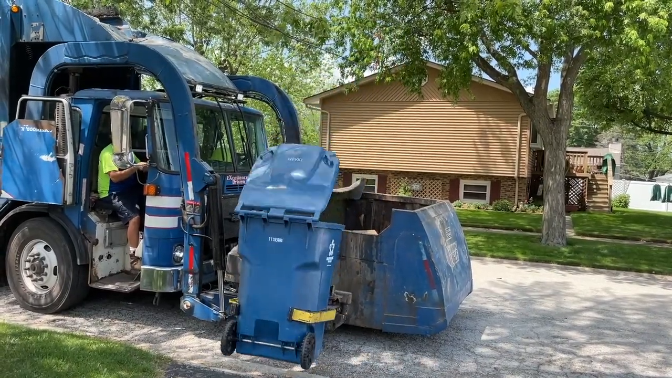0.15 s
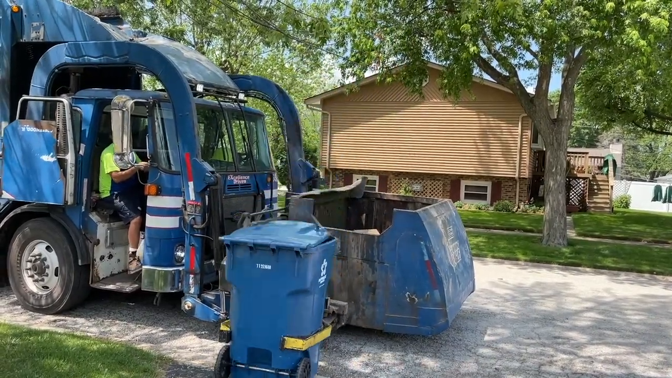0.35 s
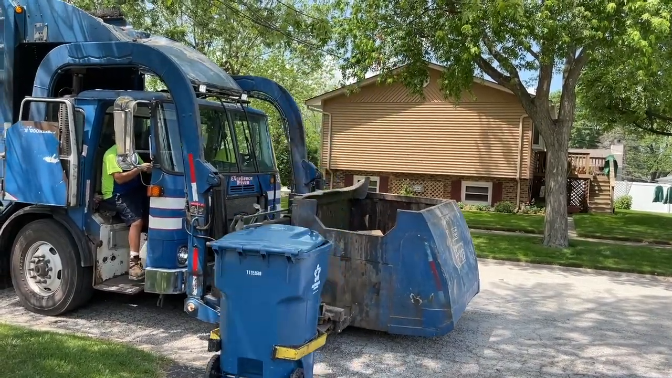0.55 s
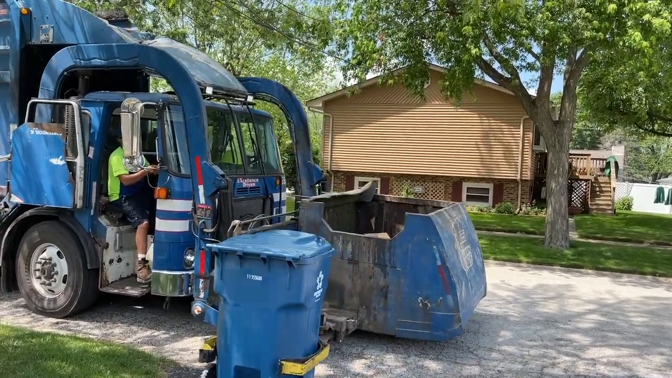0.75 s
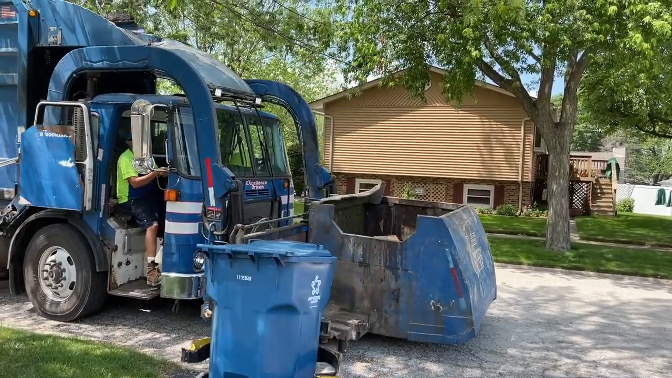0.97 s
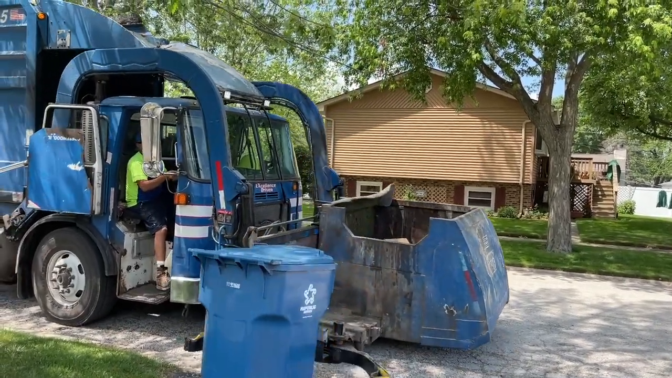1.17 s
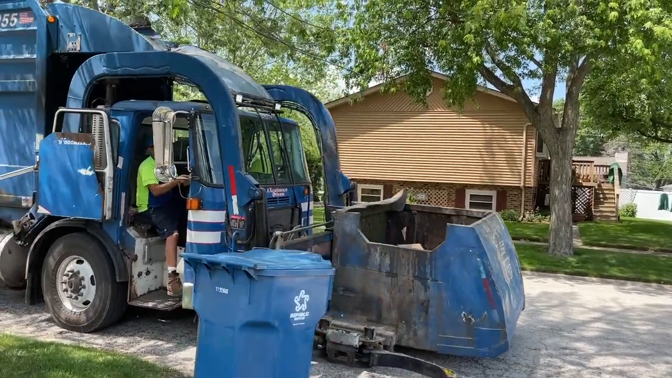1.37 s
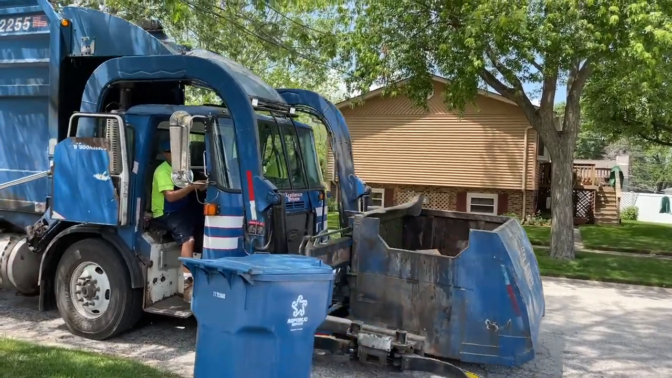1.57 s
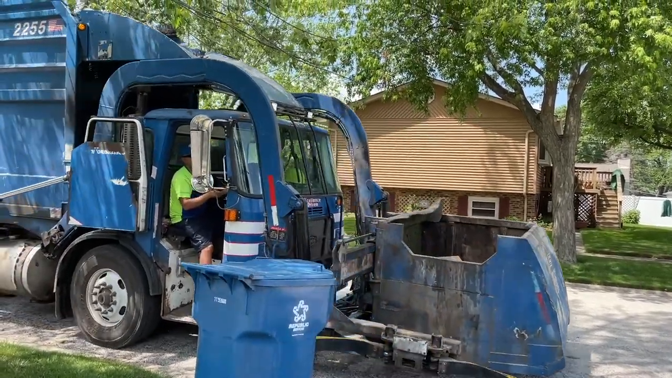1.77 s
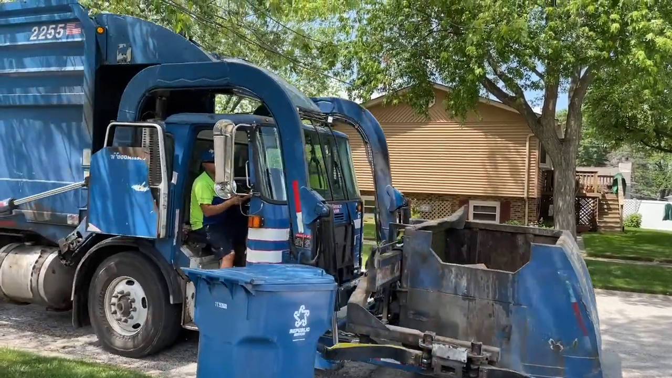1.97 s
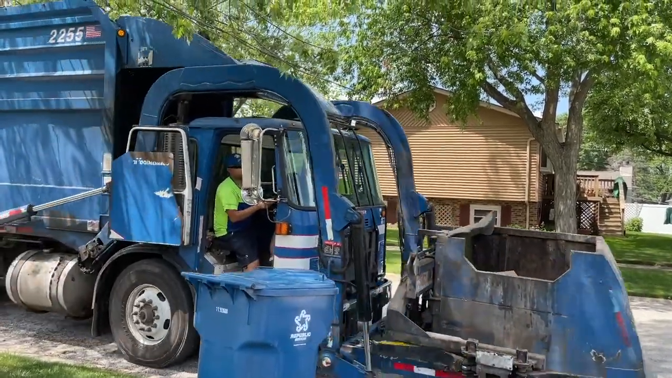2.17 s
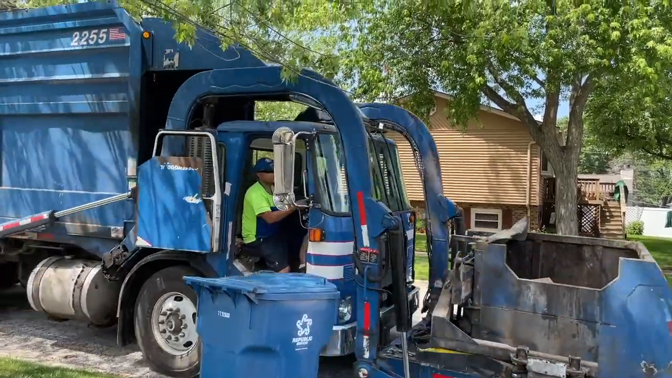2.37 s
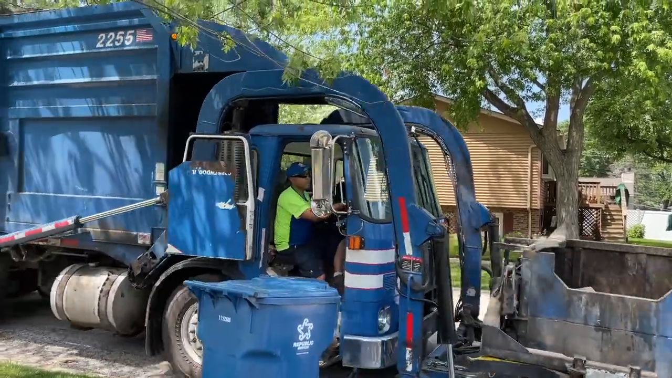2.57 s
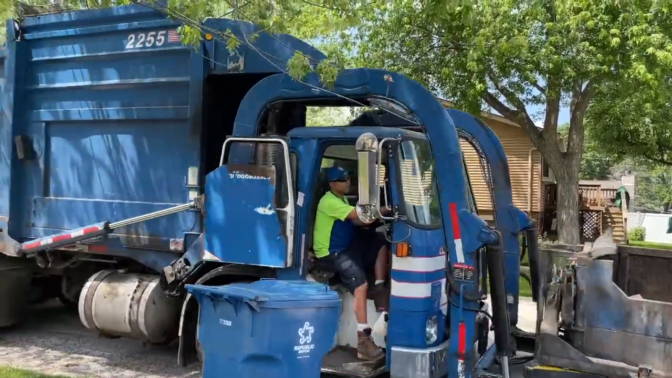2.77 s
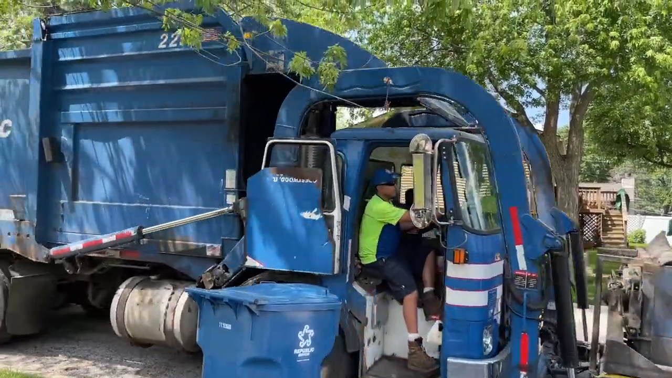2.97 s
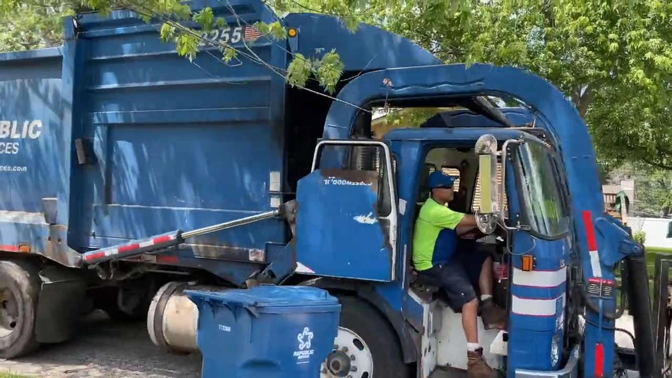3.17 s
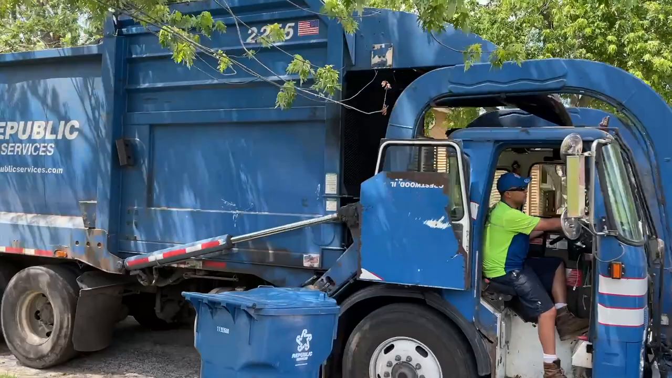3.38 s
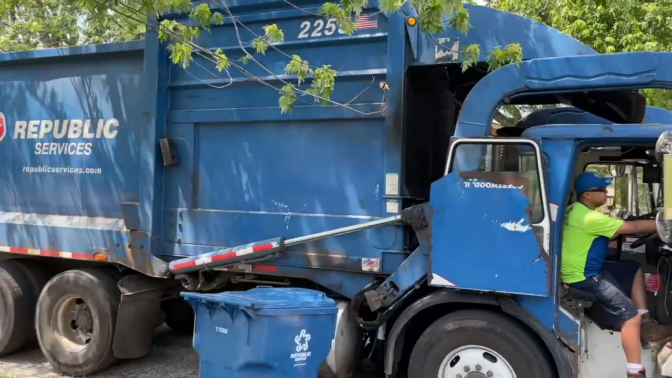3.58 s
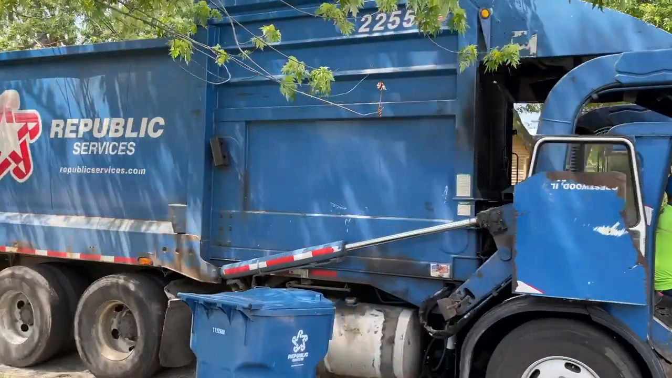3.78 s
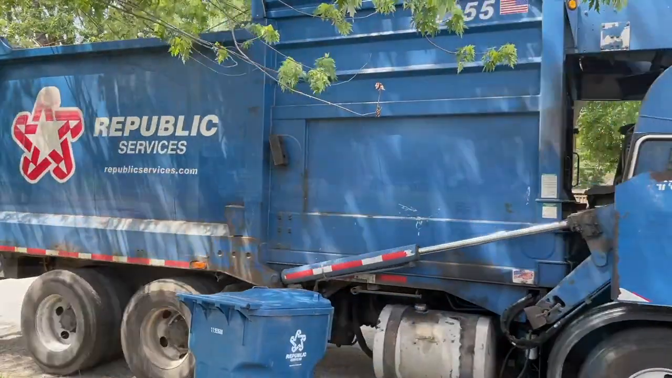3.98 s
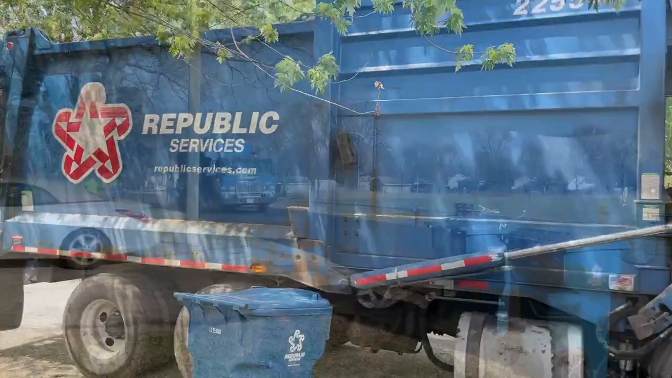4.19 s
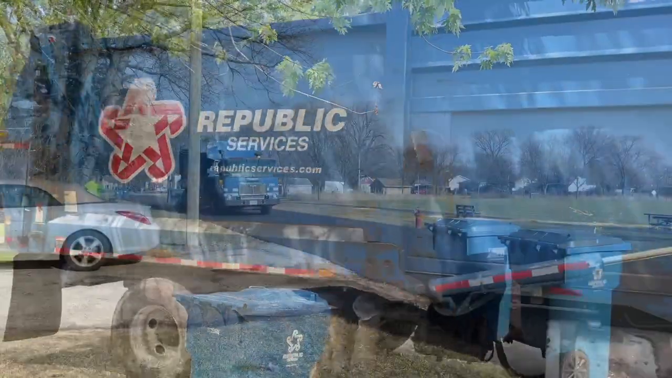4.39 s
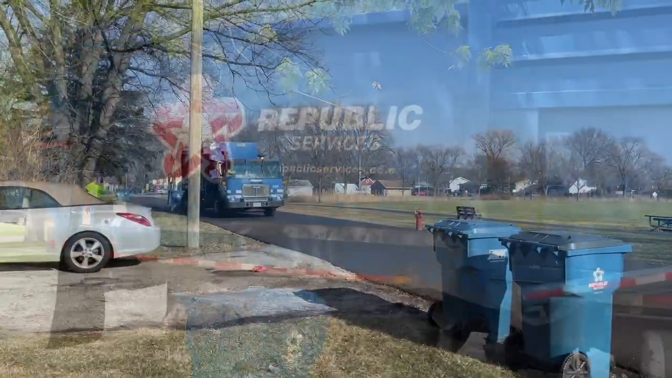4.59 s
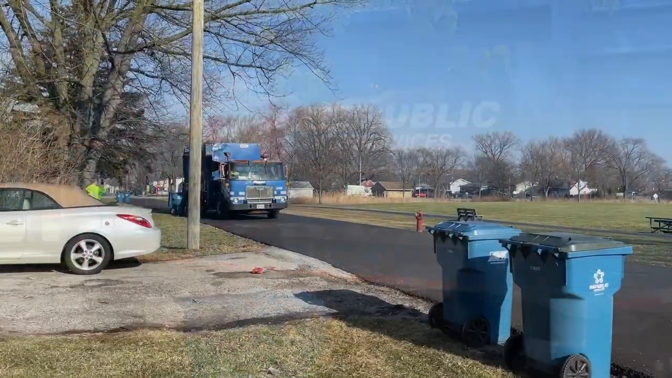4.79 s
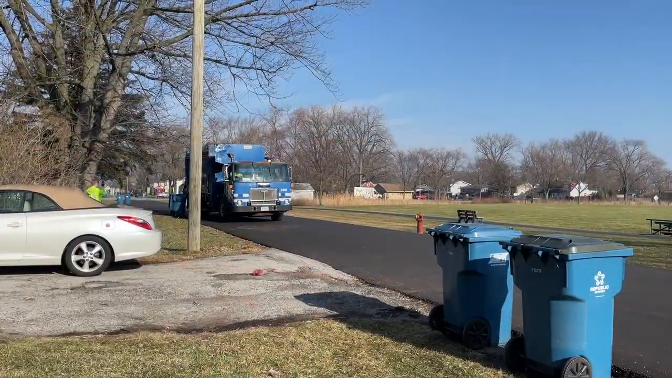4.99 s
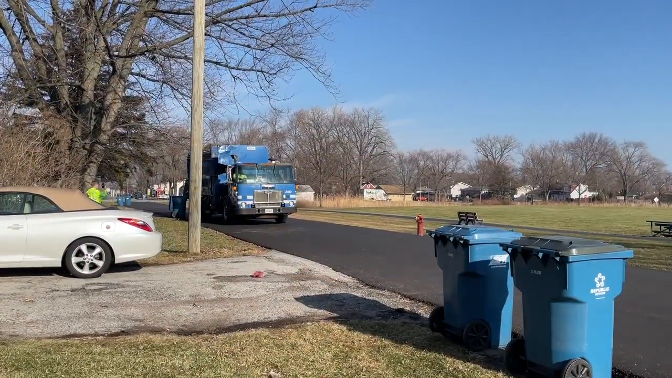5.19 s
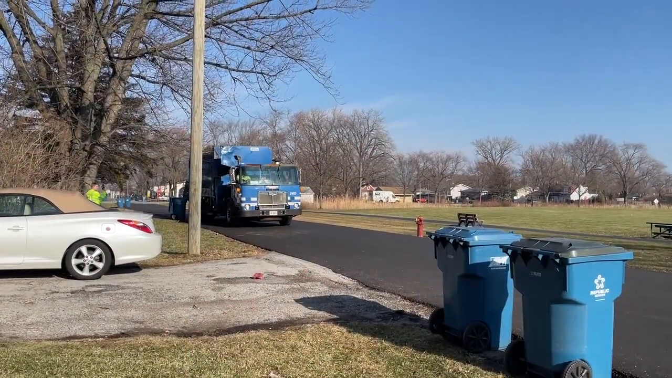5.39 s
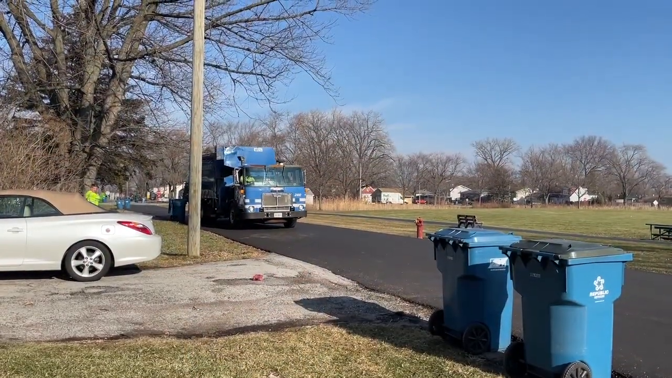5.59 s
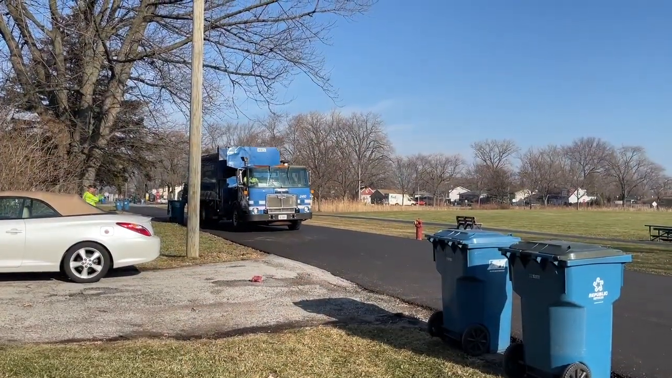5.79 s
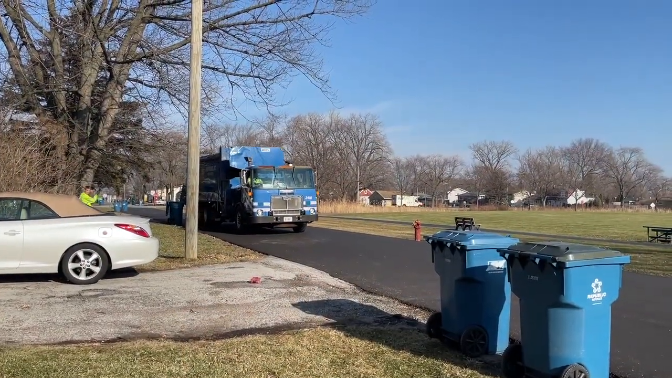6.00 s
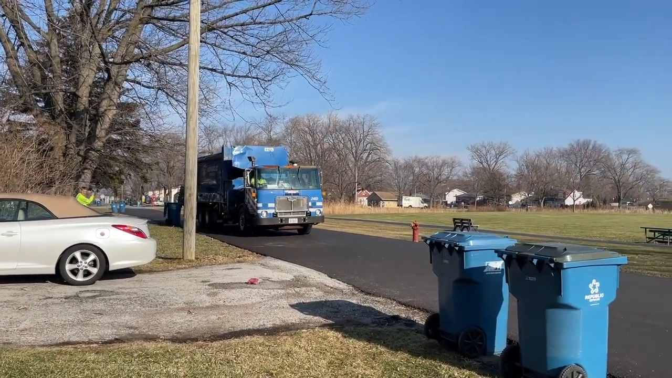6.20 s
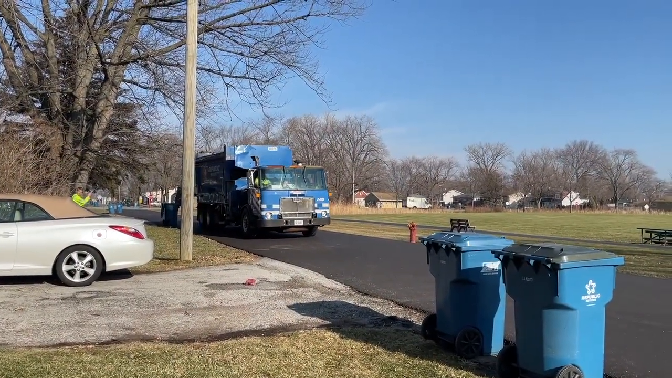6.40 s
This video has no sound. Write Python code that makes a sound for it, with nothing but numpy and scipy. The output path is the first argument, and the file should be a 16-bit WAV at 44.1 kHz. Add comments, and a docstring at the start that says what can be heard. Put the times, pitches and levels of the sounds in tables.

```python
"""A street, a few metres from a refuse truck, heard through a two-port microphone: a plastic cart is set down
(ringing thuds), the arm clanks home (struck modes) and the diesel pulls past from left to right: pump whine,
exhaust beat and turbo whistle (wavering sines), roar (noise bands). As it fades out, a second, farther truck
that hummed underneath is left (crankshaft tones, noise); it speeds up and thuds over a bump. Near the end the
sound drops out for 22 ms."""
import sys
import numpy as np
from scipy import signal
from scipy.fft import rfft, irfft
from scipy.io import wavfile
from scipy.ndimage import uniform_filter1d

SR = 44100
rng = np.random.default_rng(int(sys.argv[2]) if len(sys.argv) > 2 else 0)


def put_to_file(sound):
    """Save the sound as 16-bit audio at rate SR, in the file named by the first command-line argument."""
    columns = np.atleast_2d(sound).T  # one column per channel
    safe = np.clip(columns, -1, 1)
    whole_steps = np.round(safe * 32767)
    wavfile.write(sys.argv[1], SR, whole_steps.astype(np.int16))


N = 284445
T = np.arange(N) / SR
STEP = 32  # samples per step of the slow level controls
PATHS = 2  # direct and scattered sound
DROPOUT_S = (6.0152, 6.037)


def undb(db):
    """Amplitude factor of a level in dB."""
    return 10 ** (np.asarray(db) / 20)


def curves(table):
    """Columns of a time table, sample by sample."""
    s, *columns = np.transpose(table)
    return [np.interp(T, s, c) for c in columns]


def on_log(table, hz):
    """Second column of a frequency table, read along log frequency."""
    f, v = np.transpose(table)
    return np.interp(np.log(np.maximum(hz, 1)), np.log(f), v)


def ramp(start_s, end_s):
    """Straight rise from 0 to 1 between two times."""
    return np.clip((T - start_s) / (end_s - start_s), 0, 1)


def gate(start_s, end_s, edge_s):
    """1 between two times, with straight edges inside them."""
    return np.clip(np.minimum(T - start_s, end_s - T) / edge_s, 0, 1)


def walk(rate):
    """Random levels held 1 / rate s and slewed twice; spread near 1."""
    k = int(SR / rate)
    held = np.repeat(rng.standard_normal(size=4096)[:N // k + 1], k)
    return 1.32 * uniform_filter1d(uniform_filter1d(held, k), k)[:N]


def band(x, lo_hz, hi_hz, order=2):
    """Butterworth band-pass."""
    edges = [lo_hz, min(hi_hz, .45 * SR)]
    return signal.sosfilt(signal.butter(order, edges, "band", fs=SR, output="sos"), x)


def unit(x):
    """The signal scaled to rms 1."""
    return x / np.sqrt(np.mean(x ** 2))


def narrow(hz, width):
    """A narrow band of noise, rms 1."""
    return unit(band(rng.standard_normal(N), hz - width / 2, hz + width / 2))


def decay(t, t60):
    """Amplitude that falls 60 dB in t60 seconds."""
    return 1000. ** (-t / t60)


def ring(x, hz, t60):
    """One decaying mode, gain 1 for noise."""
    r = np.exp(-np.log(1000) / (t60 * SR))
    w = 2 * np.pi * hz / SR
    return signal.lfilter([np.sin(w) * np.sqrt(2 * (1 - r * r))], [1, -2 * r * np.cos(w), r * r], x)


def tone(hz, db, waver_db, drift, rate=12, waver_rate=14):
    """A wavering sine about the given rms level; quick drift blurs it."""
    phase = 2 * np.pi * (np.cumsum(hz * (1 + drift * walk(rate))) / SR + rng.random())
    return np.sqrt(2) * undb(db + waver_db * walk(waver_rate)) * np.sin(phase)


def far_share():
    """Share of the far street's port and scatter settings, taking over from the near ones."""
    return ramp(4.58, 4.69)


def near_fade():
    """Gain of the near truck as it fades out."""
    start_s, end_s = 4, 4.69
    return np.clip((end_s - T) / (end_s - start_s), 0, 1) ** 0.83


# far truck, steady and then drawing closer: (time [s], level about its closest [dB])
FAR_LEVEL = [(4.4, -8), (4.7, -9.5), (5.5, -6), (5.8, -3), (6.1, -2.5), (6.45, -2)]
# far crankshaft, faster after the dropout: (time [s], speed [turns/s])
FAR_CRANK = [(4.3, 21.5), (4.75, 22.8), (5.2, 25.3), (5.7, 29.2), (5.82, 29.65), (6.02, 29.8), (6.03, 33.1),
             (6.45, 32.8)]
# its tones: [cycles per crank turn], then the level of each [dB] speeding up and running steady
FAR_ORDERS = [1.5, 3, 4, 5.5, 6, 7, 8, 10, 12, 13, 15, 16, 21, 26]
FAR_EARLY_DB = [-18, -1.5, -16, -5, -7.5, -14, -31, -3, -2.5, -23, -28, -18.5, -14, -14.5]
FAR_LATE_DB = [-18, 3, -2, -3, -13, -22, -5, 0, -7, -14, -13, -14, -12, -18]
FAR_TONES_DB = -29  # common level of the far tones


def far_engine():
    """Far diesel: sines locked to multiples of the crank speed."""
    (crank,), (far_db,) = curves(FAR_CRANK), curves(FAR_LEVEL)
    out = np.zeros(N)
    for order, early_db, late_db in zip(FAR_ORDERS, FAR_EARLY_DB, FAR_LATE_DB):
        order_db = np.where(T < DROPOUT_S[1], early_db, late_db)
        out += tone(order * crank, FAR_TONES_DB + far_db + order_db, 2, 0.003)
    return out


# far fan and tyre resonances: (centre [Hz], width [Hz], closest level speeding up [dB], running steady [dB])
FAR_HUM = [(1390, 70, -46, -41), (2450, 300, -51, -44), (840, 60, -48, -46)]


def far_hum():
    """Fan and tyre resonances: narrow bands of noise that grow as the far truck nears."""
    (far_db,) = curves(FAR_LEVEL)
    out = np.zeros(N)
    for hz, width, early_db, late_db in FAR_HUM:
        db = np.where(T < DROPOUT_S[1], early_db, late_db) + far_db + 1.3 * walk(15)
        out += undb(db) * narrow(hz, width)
    return out


# hollow thuds of cart and hopper, then the far bump: (time [s], level [dB], pitch [Hz], t60 [s])
THUDS = [(0, -2.5, 95, 0.058), (.002, -10.5, 304, 0.12), (0.029, -4, 85.5, 0.12), (.062, -12, 610, 0.081),
         (0.17, -10, 78, 0.11), (0.403, 1.5, 201.4, 0.047), (0.438, -3, 89.5, 0.14), (.44, -6, 188, .06),
         (0.52, -14, 77.6, 0.24), (0.626, -8.5, 102, 0.066), (0.717, -5, 219, 0.055),
         (.731, -11.5, 167, 0.059), (0.723, -12.5, 113, 0.22), (0.884, -7, 303, .06),
         (0.899, -7, 228, 0.073), (.899, -7, 556, .05), (0.928, -9.5, 96, 0.37), (.981, -8, 546, .07),
         (.993, -9, 708, 0.084), (1.064, -8.5, 232, .06), (1.078, -8, 108, 0.087), (1.129, -12, 123, 0.17),
         (1.283, -12, 640, 0.062), (1.286, -13, 79.5, 0.12), (2.009, -10.5, 733, 0.16),
         (2.022, -22, 730, 0.076), (2.125, -12.5, 283, 0.13), (2.203, -14, 870, 0.13),
         (2.205, -10, 1180, 0.045), (2.236, -15, 596, 0.081), (2.254, -9.5, 90, 0.16),
         (5.786, -6.5, 220, 0.06), (5.785, -29, 790, 0.077), (5.789, -21, 950, 0.069),
         (5.798, -20.5, 331.5, 0.36), (5.772, -12, 118, .1), (5.81, -6.5, 83.6, 0.21),
         (5.83, -12.5, 190, .1), (5.883, -9.5, 98.4, 0.14), (5.932, -13.5, 89, 0.13)]


def rumble_power(rise_s=0.0076, t60_s=0.22):
    """Power left in loose panels by the thuds so far: a quick rise, then decay."""
    power = 0
    for s, db, *_ in THUDS:
        t = np.maximum(T[::STEP] - s, 0)
        power = power + undb(2 * db) * (1 - np.exp(-t / rise_s)) * decay(2 * t, t60_s)
    return power


# near pump: (time [s], whine pitch [Hz])
PUMP_PITCH = [(0, 135), (1, 150), (1.45, 166), (2.2, 197), (2.95, 235), (3.4, 255), (3.72, 272),
              (3.85, 270), (4.15, 253.5), (4.3, 250), (4.9, 249)]


def firing_phase():
    """Phase 0-1 of the uneven firing of the truck in front, near and then far."""
    (pump_hz,), (crank,) = curves(PUMP_PITCH), curves(FAR_CRANK)
    # far truck: six cylinders, four strokes
    firing_hz = np.where(T < FAR_LEVEL[1][0], pump_hz / 3.43, 3 * crank)
    return np.cumsum(firing_hz * (1 + .03 * walk(23))) / SR % 1


# near engine roar: (time [s], load about full [dB], treble level [dB], mids level [dB])
ROAR = [(0, -11.5, 7, 6), (.3, -16, 6.5, -1), (.6, -15, 2.5, 1), (1.1, -8.5, -3, 2), (1.6, -10, -3.5, 0.5),
        (2.05, -7.5, -0.5, 1), (2.46, -9, -4.5, 1.5), (2.65, -6, -7.5, 1.3), (2.87, -3, -7.5, 1.2),
        (3.16, 0.5, -9.5, -1.6), (3.35, 0.5, -8.5, -0.3), (3.52, 1.1, -4.5, -1), (3.8, 1.7, -2.5, 0),
        (4.06, -1.5, -3, -0.2), (4.3, -4.5, 0, 3), (4.5, -5.5, 1.5, 2)]
# how the roar follows: (frequency [Hz], near level at full load [dB], share of load [1],
# share of treble level [1], far level at its closest [dB], share of far level [1])
ROAR_LAW = [(100, -21, 0.39, 0.016, -29, 0.52), (450, -20, 1., 0.012, -32, 0.48),
            (1990, -27, 0.97, 0.044, -34, 1.21), (5220, -36.5, 0.73, 0.38, -44.5, 1.13),
            (11900, -47, 1, 1., -56, 1.27)]
# colour about those levels, near and far truck: (frequency [Hz], level per band [dB])
NEAR_COLOUR = [(35, -27), (50, -14), (80, -4), (130, -7), (200, -5.5), (330, 0), (500, -8.5), (800, -3.5),
               (1300, -7), (2450, -9), (2800, -11.5), (3300, -4), (6000, -3.5), (8500, 10.5), (11000, 9.5),
               (15000, 6)]
FAR_COLOUR = [(35, -30), (50, -16), (90, -8), (200, -3), (330, -1.5), (480, -9), (750, -0.5), (1120, -9),
              (1410, -5.5), (1780, -10), (2400, -3.5), (4000, -3.5), (6000, -3), (8500, 2), (11500, 21),
              (15000, -29)]
# panel rumble after a thud: (frequency [Hz], level per band about the thud [dB])
RUMBLE = [(50, -26), (100, -13), (300, -25.5), (800, -22.5), (2000, -34), (5500, -55), (13000, -50)]
MIDS_HZ, MIDS_OCTAVES = 1100, 1.5
# air blows off as the arm comes down, steady and then falling
BLOW_HZ, BLOW_OCTAVES, BLOW_DB, BLOW_HOLD_S, BLOW_FALL_DB_PER_S = 6600, 0.77, -37.5, 0.31, 57
FAR_RUMBLE_DB_PER_OCTAVE = -1.5  # the far bump rumbles duller, above 200 Hz


def bump(hz, centre_hz, octaves):
    """Bell-shaped weight along log frequency."""
    return np.exp(-(np.log2(hz / centre_hz) / octaves) ** 2)


def roar(firing, knock=0.58, width=0.049):
    """Engines, blown air and panels: noise bands that swell together, flicker alone and puff at each firing."""
    controls = [*curves(ROAR), *curves(FAR_LEVEL), walk(9), near_fade(), far_share()]
    load_db, treble_db, mids_db, far_db, swell, fade, distant = (c[::STEP] for c in controls)
    puff = unit(1 + knock * np.exp(-firing / width))
    panels = np.sqrt(rumble_power())
    blow_db = BLOW_DB - BLOW_FALL_DB_PER_S * np.maximum(T[::STEP] - BLOW_HOLD_S, 0)
    law = np.array(ROAR_LAW)
    out = 0
    for hz in 38.3 * 2 ** np.arange(0, 9, 1 / 3):  # third-octave centres
        full_db, load_part, treble_part, close_db, far_part = (on_log(law[:, [0, c]], hz) for c in range(1, 6))
        near_db = full_db + load_part * load_db + treble_part * treble_db
        near_db = near_db + mids_db * bump(hz, MIDS_HZ, MIDS_OCTAVES) + on_log(NEAR_COLOUR, hz)
        near = fade * undb(near_db)
        far = undb(close_db + far_part * far_db + on_log(FAR_COLOUR, hz))
        air = undb(blow_db) * bump(hz, BLOW_HZ, BLOW_OCTAVES)
        duller_db = distant * FAR_RUMBLE_DB_PER_OCTAVE * max(np.log2(hz / 200), 0)
        rumble = panels * undb(on_log(RUMBLE, hz) + duller_db)
        gain = np.sqrt(near ** 2 + far ** 2 + air ** 2 + rumble ** 2)
        noise = unit(band(rng.standard_normal((PATHS, N)), hz * 2 ** (-1 / 6), hz * 2 ** (1 / 6)))
        gain = gain * undb(0.5 * swell + 0.8 * walk(18)[::STEP])
        # combustion puffs only the upper bands
        out = out + np.interp(T, T[::STEP], gain) * noise * (puff if hz > 600 else 1)
    return out


# blurred turbocharger whistles, one table each: (time [s], pitch before smoothing [Hz], level [dB])
TURBO = [
    [(2.6, 8700, -66), (3.05, 9850, -54), (3.4, 10650, -49), (3.58, 11150, -44), (3.74, 11480, -42),
     (3.95, 11100, -44), (4.17, 10680, -48), (4.45, 10030, -50), (4.75, 9400, -64)],
    [(4.8, 9100, -66), (5.04, 9850, -56), (5.3, 10760, -54), (5.6, 11700, -53), (5.86, 12120, -52),
     (6.13, 12500, -50), (6.45, 12000, -50)],
    [(2.25, 13000, -60), (2.4, 13500, -55), (2.6, 14600, -54), (2.8, 15900, -56)],
]
TURBO_GLIDE_S = 0.161  # the whistle's pitch rounds every change of speed over this time


def turbochargers():
    """Turbocharger whistles: sines blurred by quick drift, their pitch gliding smoothly."""
    out = np.zeros(N)
    for table in TURBO:
        hz, db = curves(table)
        hz = uniform_filter1d(hz, int(TURBO_GLIDE_S * SR))
        start_s, end_s = table[0][0], table[-1][0]
        end_s += end_s > 6  # a whistle lasting past 6 s does not fade out
        out += gate(start_s, end_s, 0.088) * tone(hz, db, 2, .006, rate=500, waver_rate=60)
    return out


# a valve sings while the arm moves: (start [s], end [s], level [dB])
VALVE = [(0.052, 0.99, -64), (1.698, 2.15, -71)]
# its partials: (pitch [Hz], level about the valve's [dB])
VALVE_LINES = [(7903, 13), (7560, 5), (8300, 5), (9850, 6), (13631, -4)]


def valve():
    """Singing valve: blurred partials that sound together while the arm moves."""
    moving = sum(undb(db) * gate(start_s, end_s, 0.017) for start_s, end_s, db in VALVE)
    return moving * sum(tone(hz, db, 4, 0.005, rate=200, waver_rate=35) for hz, db in VALVE_LINES)


# brake air bursts: (time [s], length [s], level [dB])
BRAKE_AIR = [(2.232, .06, -45), (2.312, .1, -40), (1.43, .07, -48)]
# the bands they hiss through: (centre [Hz], width [Hz], level about the burst [dB])
BRAKE_AIR_BANDS = [(13240, 270, 1), (14050, 350, -8), (14700, 300, -8)]


def brake_air():
    """Escaping air: short bursts of noise in narrow high bands."""
    bursts = np.zeros(N)
    for s, length, db in BRAKE_AIR:
        rise, fall = (T - s) / .005, 2 * (s + length - T) / length
        bursts += undb(db) * np.clip(np.minimum(rise, fall), 0, 1)
    return bursts * sum(undb(db) * narrow(hz, width) for hz, width, db in BRAKE_AIR_BANDS)


# near engine block at full load: (resonance [Hz], width [Hz], level [dB])
BLOCK_RINGS = [(756, 150, -32), (1056, 110, -38.5), (1426, 96, -39.5), (1940, 300, -38.5),
               (2370, 185, -39.5), (2620, 164, -42), (1987, 50, -43.5), (371, 81, -27.5)]


def block(firing, follows=1.0, width=0.69):
    """Uneven combustion knocks ring the near engine block."""
    load_db = curves(ROAR)[0]
    knock = unit(.4 + np.exp(-firing / width))
    knock = knock * undb(follows * load_db + 1.5 * walk(45)) * near_fade()
    return knock * sum(undb(db + 2.7 * walk(11)) * narrow(hz, ring_width) for hz, ring_width, db in BLOCK_RINGS)


# near pump whine: (time [s], level [dB])
PUMP_LEVEL = [(0, -26.5), (1, -55), (1.4, -25), (1.62, -30), (1.75, -31), (1.9, -21), (2.02, -33),
              (2.2, -26), (2.3, -25), (2.41, -33), (2.46, -19), (2.58, -21.5), (2.66, -28.5), (2.8, -15.5),
              (3.05, -12), (3.3, -15), (3.72, -14.5), (3.83, -29), (4.05, -17.5), (4.14, -26.5),
              (4.21, -20), (4.45, -21.5), (4.6, -30.5), (4.85, -66)]
# tones swelling as they pass a bodywork resonance:
# (tones per pump cycle [1], resonance [Hz], width [Hz], level on it [dB], level off it [dB])
SWEPT = [(2, 374, 24, -25, -50), (2, 435, 26, -31, -60), (1 / 3.43, 54.3, 5.7, -20, -34.5),
         (1 / 3.43, 51, 2.9, -24, -60)]


def pump():
    """Pump whine and tones locked to it that swell on resonances of the bodywork."""
    (pump_hz,) = curves(PUMP_PITCH)
    out = tone(pump_hz, *curves(PUMP_LEVEL), 1.64, 0.0068, rate=40, waver_rate=25)
    for k, hz, width, on_db, off_db in SWEPT:
        db = off_db + (on_db - off_db) * np.exp(-((k * pump_hz - hz) / width) ** 2)
        out += near_fade() * tone(k * pump_hz, db, 2.06, 0.0118, rate=30)
    return out


# near exhaust passing the microphone: (time [s], pitch [Hz], level [dB])
EXHAUST = [(3.4, 102, -60), (3.65, 108.2, -20), (3.85, 119, -25), (3.95, 120.8, -18.5), (4.08, 121, -15.5),
           (4.3, 111.9, -25), (4.5, 109, -33), (4.7, 106.2, -74)]


def exhaust():
    """Exhaust beat of the passing truck: one low sine, strongly wavering."""
    return tone(*curves(EXHAUST), 3, 0.059, rate=35)


# latch taps: (time [s], level [dB])
CLINKS = [(2.277, -20), (2.311, -26), (2.331, -29)]
# modes of the latch: (pitch [Hz], level about the tap [dB], t60 [s])
LATCH_MODES = [(1980, -1, 0.044), (2730, -13, 0.035), (5300, -1, 0.035)]


def clinks():
    """Small bright clinks: each tap rings the modes of a latch."""
    out = np.zeros(N)
    for s, tap_db in CLINKS:
        t = np.maximum(T - s, 0)
        modes = sum(undb(tap_db + db) * decay(t, t60) * np.sin(2 * np.pi * hz * t) for hz, db, t60 in LATCH_MODES)
        out += (1 - np.exp(-t / 0.0011)) * modes
    return out


def thuds(push_s=0.0025):
    """A soft push rings a hollow body and a higher wall mode that dies sooner."""
    out, t = np.zeros(N), T[:int(.4 * SR)]
    for s, db, hz, t60 in THUDS:
        wall = 0.43 * min(250 / hz, 1) * np.sin(2 * np.pi * 2.62 * hz * t) * decay(t, t60)
        drum = np.sin(2 * np.pi * hz * t) + wall
        push = 1 - np.exp(-t / push_s * max(hz / 700, 1))
        i = int(s * SR)
        out[i:i + len(t)] += undb(db) * push * decay(t, t60) * drum
    return out


# arm and lid clanks: (time [s], peak [dB], low knock [dB], body [dB], treble [dB]), the last three about the peak
CLANKS = [(0.024, -7.5, -8, -6.5, -9.5), (.06, -26, 5, 2, -22), (.386, -13, -1.5, 1.5, -17.5),
          (0.405, -19.5, 4, -3, -12), (.439, -21.5, 9, 2, -28), (.459, -39, -6, -1, -22),
          (0.587, -23, -1.5, -5, -7.5), (.705, -26.5, 7, 7, -15), (.723, -36, -9, 0, -20),
          (.897, -32, 2, 2, -26), (0.977, -16, -6, -8, -4), (.984, -8, 1.5, -18, -12.5),
          (1.029, -14.5, 2, -16, -16.5), (1.072, -17.5, 2.5, -7, -19), (1.094, -31, -6, 4, -14),
          (1.132, -23.5, -18, -3, -14), (1.203, -21, -8, -9, -10.5), (1.283, -7.5, 0, -5, -22.5),
          (1.304, -30, 2, -2, -22), (1.396, -14.5, -23, -3, -8), (1.414, -16.5, 0, -2, -15),
          (1.454, -21, -1, -5, -14), (1.479, -27.5, -4, -6, -4.5), (1.564, -19, -20, 4, -19.5),
          (1.589, -22.5, 0.5, 2, -25), (1.626, -21, -9, -1, -25), (1.648, -29, -6, -8, -12),
          (1.7, -41, -6, -7, 2.5), (1.812, -29.5, 5, 7, -19), (1.993, -10.5, -22, -10, -12.5),
          (2.015, -23, 3, -6, -25), (2.201, -15.5, -28, -20, -2.5), (2.205, -6, -12, 3.5, -30),
          (2.223, -22, -5, -1, -6), (2.24, -23.5, -3, 6, -18), (2.255, -33, -3, -3, -23),
          (2.279, -24, -9, 1, -28), (2.31, -24, -10, -5, -11), (2.335, -35, -4, -5, -1)]
# modes of the arm: (pitch [Hz], level [dB], t60 [s])
ARM_MODES = [(560, 0, 0.07), (645, 0, 0.07), (834, 2, 0.05), (1100, 1, 0.04), (1490, 3, 0.05),
             (1740, -2, .05), (1920, 5, 0.05), (2190, -1, 0.04), (2530, 4, 0.05), (2910, -2, .04),
             (3240, -1, 0.04), (3750, -3, 0.04), (4570, -6, 0.04), (5160, -5, 0.03)]
RATTLES, RATTLE_DB, RATTLE_T60_S, RATTLE_SCATTER_DB = 600, -41.5, 0.61, 2.5


def rattle():
    """Loose parts chatter on after each clank: small random knocks that barely ring the arm."""
    when, size = rng.random((RATTLES, 2)).T
    end = int(2.7 * SR)
    at = (when * end).astype(int)
    shaken = 0
    for s, db, *_ in CLANKS:
        after = np.maximum(T[at] - s, 0)
        shaken = shaken + undb(db) * (T[at] > s) * decay(after, RATTLE_T60_S)
    knocks = np.zeros(end)
    knocks[at] = shaken * undb(-RATTLE_SCATTER_DB * np.log(1 - size))
    envelope = signal.lfilter([1], [1, -np.exp(-1 / (0.007 * SR))], knocks)
    shake = envelope * rng.standard_normal((PATHS, end))
    rung = sum(undb(db - 24) * ring(shake, hz, t60) for hz, db, t60 in ARM_MODES)
    body = band(shake, 500, 3800) + rung
    return np.pad(undb(RATTLE_DB) * unit(body), [(0, 0), (0, N - end)])


CONTACT_S, CLANK_TAIL_T60_S = 0.0047, 0.18
TREBLE_DIES_S = 0.2  # decay time of a clank band starting at 1 kHz; shorter with the root of pitch
RING_DB, RING_SCATTER_DB = -23, 2.5  # modes under the crack, each blow striking them differently
CHATTER_DB, CHATTER_S = 3.5, .0015  # the contact chatters
SNAP_SHARE = 0.86  # the snap band follows part of the treble level
TOP_DROP_DB = -12  # the top lies under the treble


def clanks(tail_db=-12, snap_db=2, bright_db=3, sharp=1.17):
    """A chattering contact of a few ms shakes the arm's modes, cracks broadly and leaves a short tail."""
    out, t = np.zeros((PATHS, N)), T[:SR // 5]
    edges_hz = [(350, 900), (900, 1600), (1600, 2750), (2750, 4200), (4200, 7800), (7800, 17000)]
    x = t / CONTACT_S
    tail = undb(tail_db) * (1 - np.exp(-x)) * decay(t, CLANK_TAIL_T60_S)
    shape = (x * np.exp(1 - x)) ** sharp + tail
    step = int(CHATTER_S * SR)
    for s, peak_db, low_db, body_db, treble_db in CLANKS:
        held = np.repeat(rng.standard_normal(len(t) // step + 1), step)[:len(t)]
        shake = shape * undb(CHATTER_DB * held) * rng.standard_normal((PATHS, len(t)))
        body = shake.copy()
        for hz, db, t60 in ARM_MODES:
            level, detune = rng.standard_normal(2)
            mode_db = db + RING_DB + RING_SCATTER_DB * level
            body += undb(mode_db) * ring(shake, hz * (1 + 0.015 * detune), t60)
        bright = treble_db + bright_db
        snap = SNAP_SHARE * treble_db + snap_db
        bands_db = [low_db + 1, body_db - 6, -3, snap, bright, bright + TOP_DROP_DB]
        i = int(s * SR)
        for n, (edge, db) in enumerate(zip(edges_hz, bands_db)):
            # alternate signs let neighbouring bands join without a notch
            part = (-1) ** n * band(body, *edge) * np.exp(-t * np.sqrt(edge[0] / 1000) / TREBLE_DIES_S)
            # envelope peak over 4 ms
            crest = np.sqrt(2 * uniform_filter1d(part ** 2, size=SR // 250).max(axis=1, keepdims=True))
            out[:, i:i + len(t)] += undb(peak_db + db) * part / crest
    return out


# share of sound that differs left and right: (frequency [Hz], level about the scattered sound [dB])
SPREAD = [(60, -28), (380, -19), (700, -10), (1300, -8), (2400, -6), (3000, -3.5), (4600, -2), (5600, -7),
          (7000, -2.5), (7800, -18), (10000, -34.5), (11500, -8), (15000, -49)]
FAR_SPREAD_DB = 0.4  # scatter of the far street about that of the near one


def scene():
    """Everything arrives from the front; scattered sound makes the two sides differ."""
    firing = firing_phase()
    front, scattered = roar(firing) + clanks() + rattle()
    plain = far_engine() + far_hum() + turbochargers() + valve() + brake_air()
    plain = plain + block(firing) + pump() + exhaust() + clinks() + thuds()
    echo = np.roll(plain, int(0.0065 * SR))
    spread = undb(on_log(SPREAD, np.fft.rfftfreq(N, 1 / SR)))
    side = irfft(rfft(scattered + echo) * spread, N) * undb(FAR_SPREAD_DB * far_share())
    return np.array([front + plain + side, front + plain - side])


def ports(dry, turn, balance):
    """The two microphone ports differ in level and in phase, from the lows up to the treble."""
    hz = np.fft.rfftfreq(N, 1 / SR)
    port = np.exp(.5j * on_log(turn, hz)) * undb(on_log(balance, hz) / 2)
    return irfft(rfft(dry) * np.array([port, 1 / port]), N)


# port phase: (frequency [Hz], left lead [rad]); port balance: (frequency [Hz], left minus right [dB])
# near truck on the left
LEFT_TURN = [(60, .05), (250, .2), (850, .6), (1200, .3), (1700, 0), (2300, .3), (2850, .95), (3600, .6),
             (4900, .9), (5700, -1.3), (6600, -1.2), (7600, -np.pi), (10000, -np.pi), (11500, -2 * np.pi)]
LEFT_BALANCE = [(60, -1.4), (200, -1), (380, -.3), (600, 0), (900, 1.8), (1290, 2), (2380, 0), (4400, -1),
                (7600, 0), (15000, 0)]
# near engine gone to the right
PASSED_TURN = [(60, 0), (250, 0), (600, -.45), (850, -.15), (1700, -.65), (2300, -.35), (2850, .7),
               (3600, .2), (4900, .9), (5700, -1.3), (6600, -1.2), (7600, -np.pi), (10000, -np.pi),
               (11500, -2 * np.pi)]
PASSED_BALANCE = [(60, -1.5), (250, -2), (400, -1.3), (700, -3.2), (1290, -.3), (2380, .3), (2900, 1.5),
                  (4400, -1), (7600, 0), (15000, 0)]
# far truck, off to the left
FAR_TURN = [(60, .1), (250, .4), (600, .9), (850, 1.3), (1200, -.1), (1700, .5), (2300, 1.), (3600, 1.5),
            (4600, 1.4), (5600, -.5), (6600, -1.7), (7600, -np.pi), (10000, -np.pi), (12500, -2 * np.pi)]
FAR_BALANCE = [(60, -4), (110, -0.5), (200, 0), (600, 1.5), (850, 8.5), (1290, 6.5), (2380, 6), (3600, 7),
               (4600, 7), (5600, 10), (7600, -10.5), (10000, 6), (15000, -4)]
TOP_HZ = 15750


def record(dry):
    """Ports as the passing and the far truck meet them; peaks round off, a short dropout, a steep top cut."""
    far = far_share()
    passed = ramp(2, 4)
    wet = ports(dry * (1 - far) * (1 - passed), LEFT_TURN, LEFT_BALANCE)
    wet = wet + ports(dry * (1 - far) * passed, PASSED_TURN, PASSED_BALANCE)
    wet = wet + ports(dry * far, FAR_TURN, FAR_BALANCE)
    # the capsule drops the deepest bass
    wet = signal.sosfilt(signal.butter(2, 38, "high", fs=SR, output="sos"), wet)
    wet = np.tanh(0.77 * wet) / 0.88
    wet = wet * ((T < DROPOUT_S[0]) | (T > DROPOUT_S[1]))
    return signal.sosfilt(signal.ellip(10, .2, 80, TOP_HZ, fs=SR, output="sos"), wet)


dry = scene()
out = record(dry)
put_to_file(out)
```